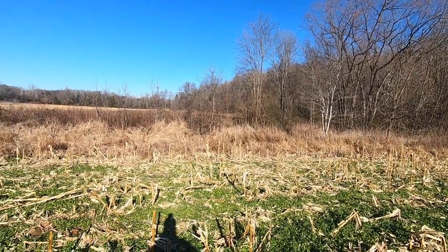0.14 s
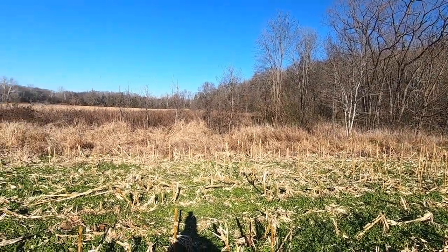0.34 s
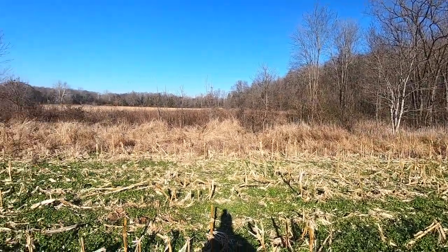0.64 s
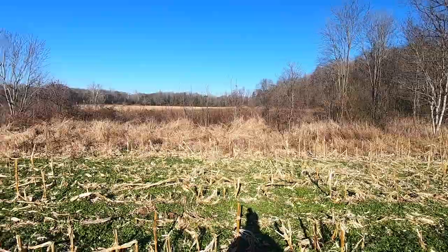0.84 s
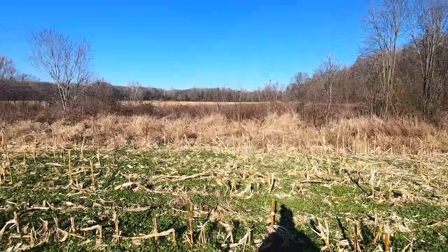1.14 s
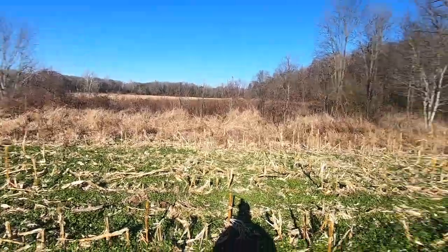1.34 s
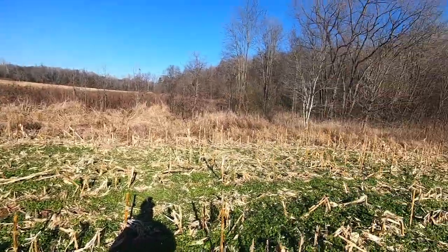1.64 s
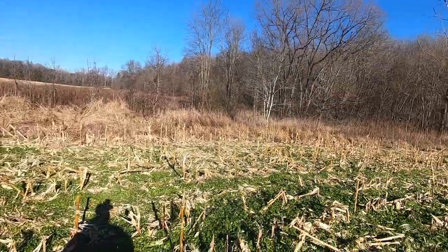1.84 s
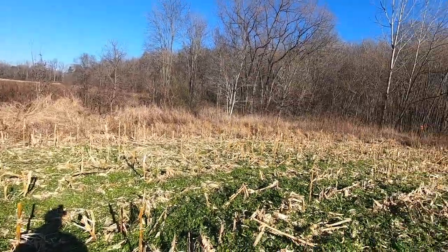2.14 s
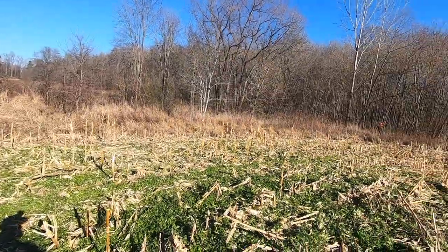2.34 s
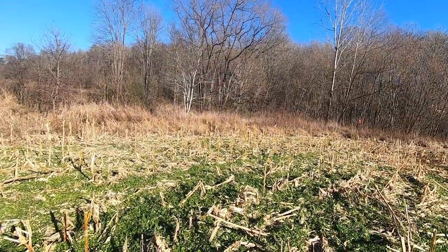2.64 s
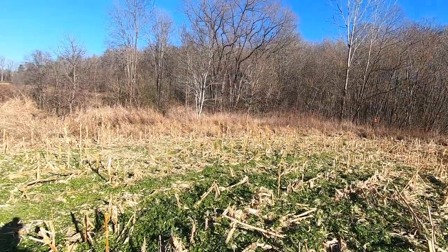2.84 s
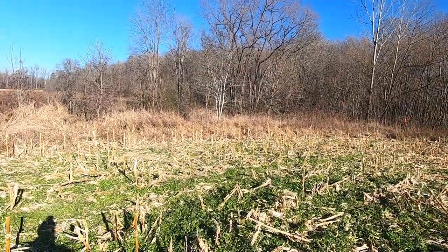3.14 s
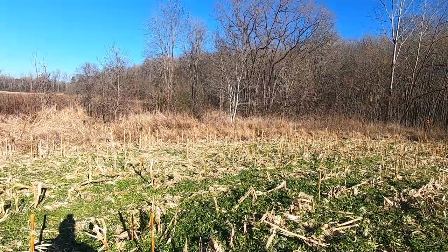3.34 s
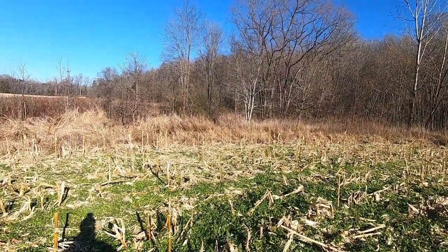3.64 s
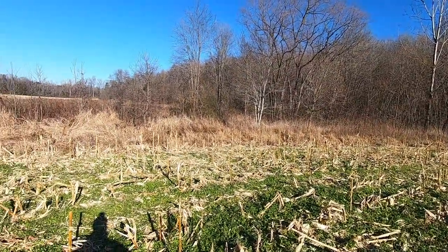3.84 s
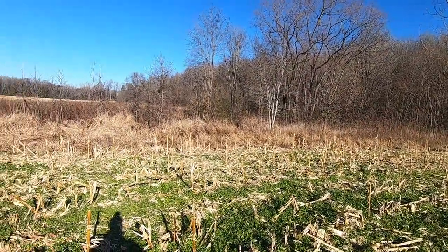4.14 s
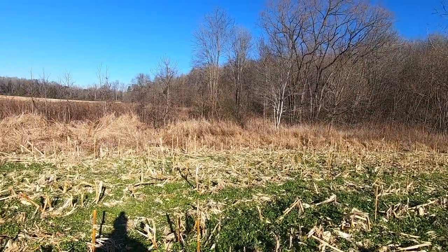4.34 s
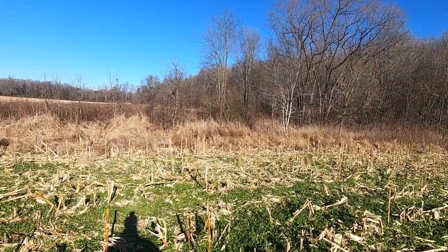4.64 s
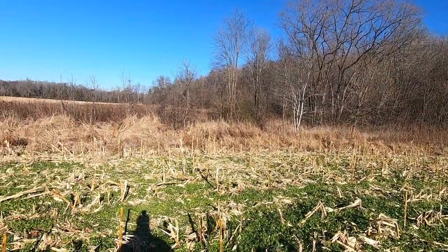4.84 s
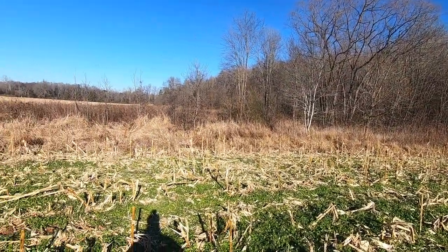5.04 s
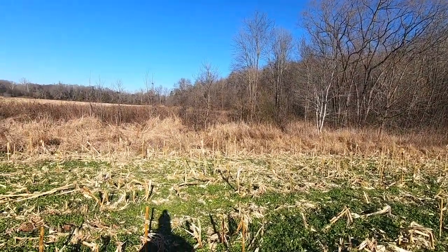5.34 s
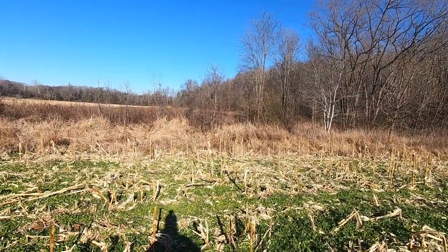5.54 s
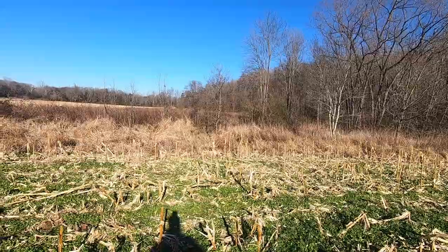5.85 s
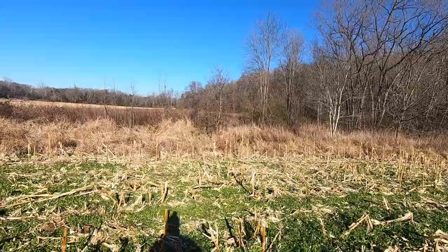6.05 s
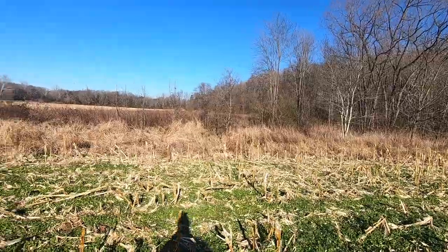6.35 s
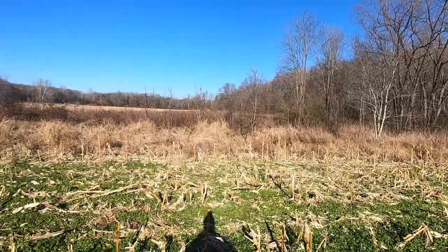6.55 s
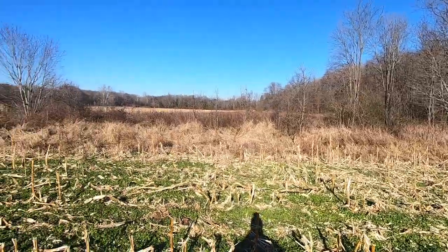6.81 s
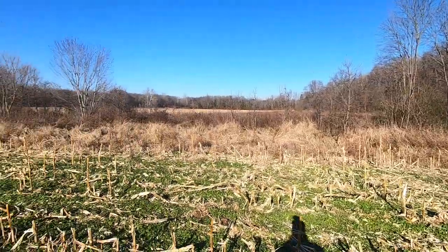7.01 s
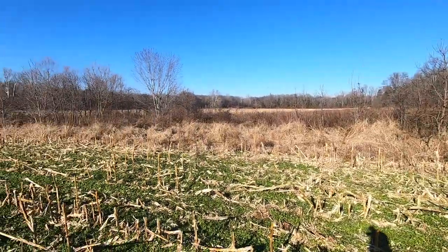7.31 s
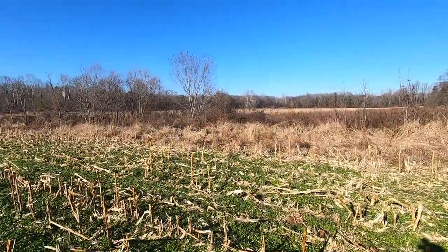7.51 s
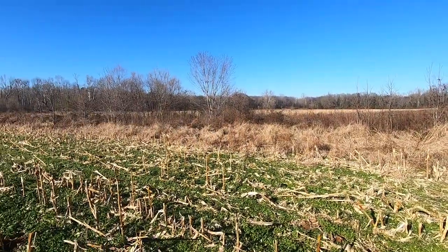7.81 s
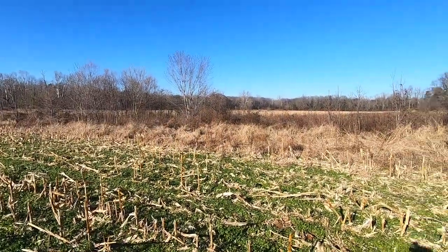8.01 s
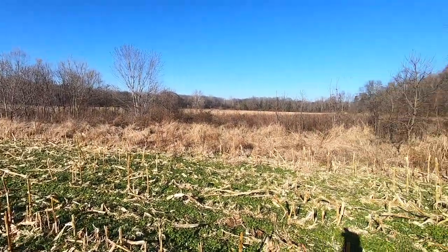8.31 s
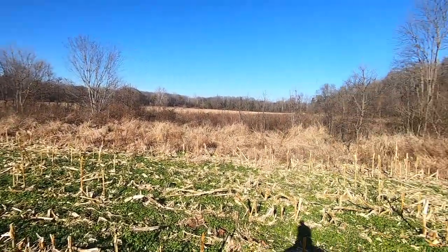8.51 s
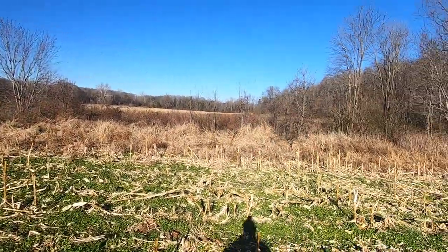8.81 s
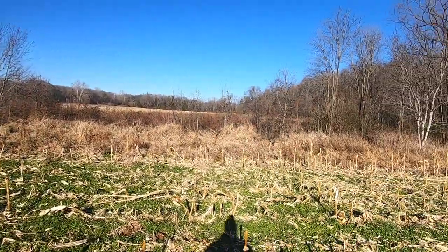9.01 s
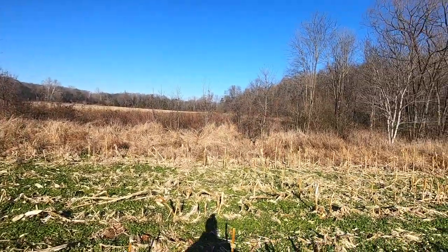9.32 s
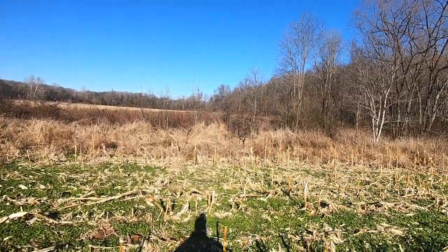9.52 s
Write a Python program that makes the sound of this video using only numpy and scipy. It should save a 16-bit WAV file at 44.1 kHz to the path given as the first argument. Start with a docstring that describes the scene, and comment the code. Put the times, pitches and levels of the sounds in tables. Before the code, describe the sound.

Hounds on a trail give clear bays, rough barks and a high squeal, echoing off woods over low wind drone and later rustling.

```python
"""A pack of beagles runs a trail in the brush beyond a stubble field, in light wind over a low drone.
From the start clean bays and hoarse barks overlap, built from harmonics that roughen with hoarseness,
and the edge of the woods returns a diffuse noise tail. One high squeal rises about 5 s in, among yelps.
Buffeting noise on the ports grows from 4 s. A dry noise rustles close by, plainest from about 7 s,
as the camera swings round and the pack shifts between the ports; two soft knocks follow near 8.7 s."""
import sys
import numpy as np
from scipy import signal
from scipy.fft import rfft, irfft, next_fast_len
from scipy.io import wavfile
from scipy.ndimage import uniform_filter1d, minimum_filter1d, map_coordinates

SR = 44100
rng = np.random.default_rng(int(sys.argv[2]) if len(sys.argv) > 2 else 0)


def pcm_store(signal):
    """Save signal as 16-bit PCM."""
    levels = np.round(np.clip(np.atleast_2d(signal), -1, 1) * 32767)
    wavfile.write(sys.argv[1], SR, levels.astype(np.int16).T)


N = 426447
TOP_HZ = 15900  # band limit of the recorder


def amp(db):
    """Turn decibels into a gain factor on the sound pressure."""
    return 10 ** (np.asarray(db) / 20)


def unit(x):
    """Scale to rms 1, so that a level in dB can be set afterwards."""
    return x / np.sqrt(np.mean(x ** 2) + 1e-20)


def along(points, hz):
    """Read (f/Hz, value) points on a log frequency axis."""
    f, values = np.transpose(points)
    return np.interp(np.log(hz + 1), np.log(f + 1), values)


def curve(rows):
    """Read (t/s, value) rows at every sample."""
    return np.interp(np.arange(N) / SR, *np.transpose(rows))


def wobble(rate, size=N):
    """A smooth random curve with rate knots a second."""
    knots = rng.standard_normal(int(max(size / SR, .5) * rate) + 4)
    return map_coordinates(knots, [np.arange(size) * rate / SR + 1])


def filtered(x, response):
    """Weight the spectrum by a response that is a function of frequency."""
    padded = next_fast_len(N + SR // 2)
    spectrum = rfft(x, padded) * response(np.fft.rfftfreq(padded, 1 / SR))
    return irfft(spectrum, padded)[..., :N]


def noise(colour, alike):
    """Coloured stereo noise of rms 1; alike is the share of its power common to both ports."""
    white = rng.standard_normal((3, N))
    mixed = np.sqrt(alike) * white[2] + np.sqrt(1 - alike) * white[:2]
    return unit(filtered(mixed, lambda hz: amp(along(colour, hz))))


def panned(x, left_db):
    """Tilt the balance between the two ports: half the difference up on one, half down on the other."""
    return x * amp(np.array([[1], [-1]]) * left_db / 2)


def span(start, length):
    """The sample times of one event."""
    return max(start, 0) + np.arange(int(length * SR)) / SR


def bursts(rows, t60):
    """An envelope that jumps at each (t/s, level/dB) row and dies by 60 dB in t60 seconds."""
    envelope, age = np.zeros(N), np.arange(SR // 8) / SR
    for s, db in rows:
        envelope[round(s * SR):][:len(age)] += amp(db - 60 * age / t60)
    return envelope


def hush(body_db=-3, swing_db=4.5, body_hz=450):
    """A steady hiss whose low body swells and ebbs at random, like soft rubbing."""
    # Colour of the hiss and its low body: f/Hz, relative density/dB
    air_colour = [(30, -3.5), (100, -14), (300, 9.5), (700, -13), (2500, -2), (4500, -7.5), (9000, -20.5),
                  (11000, -30), (13000, -25), (15500, -55.5)]
    air = noise(air_colour, alike=0.75)
    body = filtered(air, lambda hz: 1 / (1 + (hz / body_hz) ** 8))
    return air - body + body * amp(body_db + swing_db * wobble(7))


def wind(breeze_db=-37, drone_db=-32, drone_hz=45.8, hush_db=-48):
    """Lumpy buffeting on each port, a low drone with its octave, and a faint hush under both."""
    # Gusts on the ports: t/s at the peak, half width/s, level/dB before the balance
    gust_rows = [(0.7, 0.24, -34.5), (1.53, 0.058, -34), (1.86, 0.037, -33.5), (4.04, 0.031, -27.5),
                 (4.4, 0.15, -26.5), (5.799, 0.18, -25.5), (6.2, 0.13, -19.5), (6.521, 0.11, -23),
                 (6.8, 0.13, -18), (8.85, 0.037, -19), (9.2, 0.27, -24), (9.639, 0.043, -7)]
    # Colour of the buffeting: f/Hz, relative density/dB
    buffet_colour = [(12, -39.5), (20, -16), (43, -0.5), (87, -2), (128, -8.5), (259, -26), (420, -43),
                     (550, -60.5), (920, -120)]
    t = np.arange(N) / SR
    swells = sum(amp(db) * np.exp(-((t - s) / width) ** 2) for s, width, db in gust_rows)
    strength = amp(breeze_db) + swells
    # Each port has its own lumps, held within 5 dB up or down.
    lumps = amp(5 * np.tanh(np.array([wobble(24), wobble(24)])))
    buffet = strength * unit(lumps * noise(buffet_colour, alike=0.52))
    phase = 2 * np.pi * np.cumsum(drone_hz * (1 + 0.0444 * wobble(14))) / SR
    tone = unit(np.sin(phase) + 0.39 * np.sin(2 * phase))
    drone = amp(drone_db + 2.6 * wobble(9.8)) * tone
    return panned(buffet, left_db=-6.5) + drone + amp(hush_db) * hush()


def rustle(level_db=-1, grain_db=2.0, snap_db=-8, rise=0.21):
    """Dry rubbing noise, grainy in time: each rub rises quickly and ebbs, with sharper snaps and two knocks."""
    # Faint rustle under the rubs: t/s, relative level/dB
    floor_rows = [(0, -48.5), (1.5, -50), (2.1, -55), (2.8, -55.5), (3.8, -49.5), (6.5, -44.5), (9.67, -44)]
    # Dry rubs close by: t/s, length/s, relative level/dB
    rub_rows = [(1.3, .45, -43), (6.683, 0.28, -40.5), (7.167, 0.27, -30.5), (7.31, 0.61, -39.5),
                (7.722, 0.05, -37), (8.017, 0.47, -39), (8.374, .3, -40.5), (8.617, 0.12, -32.5)]
    # Dry snaps within the rustle: t/s, relative peak level/dB
    snap_rows = [(7.0435, -35), (7.0685, -21), (7.195, -26), (7.308, -26), (7.5063, -25.5), (7.5523, -28.5),
                 (7.937, -42), (8.0267, -22)]
    # Soft handling knocks on the camera: t/s, level/dB
    knock_rows = [(8.72, -27), (8.735, -26)]
    # Colours of the dry stuff and of the camera case: f/Hz, relative density/dB
    dry_colour = [(300, 6.5), (1500, 3), (5000, -8), (7000, -8.5), (8700, -5.5), (11000, -16), (14000, -27),
                  (16000, -28.5)]
    case_colour = [(80, -6), (300, -2), (700, -7.5), (1700, -17), (2600, -22), (6000, -45.5)]
    t = np.arange(N) / SR

    def stroke(age):
        """The force of one rub, which peaks at age 1."""
        return age * np.exp(1 - age)

    rubs = sum(amp(db) * stroke(np.maximum(t - s, 0) / (rise * length)) for s, length, db in rub_rows)
    force = amp(curve(floor_rows)) + rubs
    grain = unit(amp(grain_db * wobble(260) + 2.8 * wobble(30)))
    strength = amp(level_db) * force * grain + amp(snap_db) * bursts(snap_rows, t60=0.091)
    rubbing = strength * noise(dry_colour, alike=0.24)
    knocks = bursts(knock_rows, t60=0.11) * noise(case_colour, alike=0.93)
    return panned(rubbing, left_db=-6) + knocks


def woods(x, build=0.012, apart=0.74):
    """Trunks scatter the calls back in a diffuse tail that builds up and decays at a rate set by frequency."""
    # Echo of the woods: f/Hz, t60/s
    decay_times = [(600, .75), (1400, .8), (2800, .6), (8000, .3)]
    hz, t, z = signal.stft(rng.standard_normal((2, SR)), SR, nperseg=256)
    z = z * amp(-60 * t / along(decay_times, hz)[:, None]) * (1 - np.exp(-t / build))
    common, own = signal.istft(z, SR, nperseg=256)[1]
    tail = np.array([common + apart * own, common - apart * own])
    return signal.fftconvolve(x[None], tail / np.linalg.norm(tail[0]), axes=1)[:, :N]


def whistles(waver=0.018):
    """A second, much higher oscillator in the throat glides for a moment."""
    # Thin whistles amid the fiercest barking: t/s, length/s, start f/Hz, end f/Hz, peak level/dB
    whistle_rows = [(5.797, 0.065, 7170, 7730, -40), (6.15, .09, 7200, 6600, -43),
                    (6.317, 0.029, 7770, 7900, -32.5)]
    sound = np.zeros(N)
    for start, length, from_hz, to_hz, db in whistle_rows:
        t = span(start, length)
        hz = np.linspace(from_hz, to_hz, len(t)) * (1 + waver * wobble(90, len(t)))
        tone = np.sin(2 * np.pi * np.cumsum(hz) / SR)
        sound[round(start * SR):][:len(t)] += amp(db) * np.hanning(len(t)) ** .5 * tone
    return sound


def bay(t, pitch, hoarse, first_db, second_db, mouth_db, mouth_hz,
        low_doubling=0.53, doubling=0.76,  # beat depth of the fundamental against the rest; of a hoarse voice
        jitter=0.98, rasp=0.98, rasp_hz=330,  # phase and share of the chaos, and its knots a second
        waver=0.0058, lurch=.02,  # pitch unsteadiness, clean and added by hoarseness
        mouth_width_hz=480, flutter_db=3.0, blur=0.31,
        attack=0.0019, release=0.023):  # s
    """One call: harmonics of the vocal folds, whose cycles turn irregular as the hound goes hoarse."""
    # Higher resonances of the muzzle: f/Hz, level/dB relative to the mouth resonance
    muzzle = [(2500, -49), (3300, -21.5), (4000, -37.5), (5400, -31), (7500, -39.5), (10500, -47.5),
              (14000, -87)]
    # A bay near 6 s cracks into period doubling: t/s, added depth of the every-other-cycle beat
    crack_rows = [(6.04, 0), (6.06, 0.3), (6.105, 1.5), (6.12, 0.0015)]
    # Brush between the hounds and the field: t/s, cover 0-1
    cover_rows = [(0, 0.92), (2.8, 0.8), (4.7, 0.48), (7, 0.81), (9.6, 0.59)]
    hoarse, size = np.clip(hoarse, 0, 1), len(t)
    k = np.arange(1, 14)[:, None]  # harmonic numbers

    def each(rate):
        """An independent wobble for every harmonic."""
        return np.array([wobble(rate, size) for _ in k])

    # The open mouth lifts whichever overtones lie near its resonance.
    mouth = 1 / (1 + ((k * pitch - mouth_hz) / mouth_width_hz) ** 4)
    upper = (k > 2) * (mouth + amp(along(muzzle, k * pitch)))
    upper = upper / np.linalg.norm(upper, axis=0)
    gains = amp(mouth_db) * upper + (k == 1) * amp(first_db) + (k == 2) * amp(second_db)

    # A strained voice lurches in pitch.
    phase = 2 * np.pi * np.cumsum(pitch * (1 + (waver + lurch * hoarse) * wobble(83.8, size))) / SR

    # Chaotic vibration takes a share of every harmonic and spreads it into a band, widest for the overtones.
    share = np.clip(rasp * hoarse, 0, 1) ** 2
    chaos = each(rasp_hz) + 1j * each(rasp_hz)
    chaos = chaos / np.sqrt(np.abs(chaos) + 1e-9)  # even out its swings in level
    chaos = chaos * np.exp(1j * jitter * np.minimum(k, 3) * wobble(330, size))
    voice = np.sqrt(1 - share) + np.sqrt(share) * chaos

    # When strong and weak cycles alternate, lines appear halfway between the overtones.
    depth = doubling * hoarse + np.interp(t, *np.transpose(crack_rows))
    voice = voice * (1 + np.where(k > 1, 1, low_doubling) * depth * np.cos(phase / 2))

    # As the hound runs, shifting paths through the brush make each harmonic flutter and blur the higher ones.
    cover = np.interp(t[0], *np.transpose(cover_rows))
    flutter = unit(amp(flutter_db * cover * each(54.6)))
    paths = flutter * np.exp(1j * blur * cover * np.minimum(k, 4) * each(110.8))

    harmonics = np.imag(voice * paths * np.exp(1j * k * phase))
    sound = np.sum(gains * (k * pitch < TOP_HZ) * harmonics, axis=0)
    gate = np.clip((t - t[0]) / attack, 0, 1) * np.clip((t[-1] - t) / release, 0, 1)
    # The root of 2 makes the harmonic levels rms levels.
    return np.pad(np.sqrt(2) * sound * gate, (round(t[0] * SR), N))[:N]


def squeal(hoarse=0.013, third_db=-43, mouth_hz=4300):
    """One hound holds a thin, clean note an octave above the rest."""
    # The long squeal: t/s, pitch f/Hz, fundamental level/dB, second harmonic level/dB
    squeal_rows = [(5.045, 1463, -17, -23), (5.065, 1486, -11.5, -14), (5.145, 1375, -13.5, -15.5),
                   (5.235, 1434, -19, -19.5), (5.261, 1420, -42, -21), (5.293, 1433, -15, -23),
                   (5.31, 1460, -17, -26)]
    s, *columns = np.transpose(squeal_rows)
    t = span(s[0], s[-1] - s[0])
    pitch, first_db, second_db = [np.interp(t, s, column) for column in columns]
    return bay(t, pitch, hoarse, first_db, second_db, third_db, mouth_hz)


def call(row, swell_db, second_swell_db, bright_db, fade_db, roundness, edge_rasp, catch, catch_s, closing,
         shut_db=4, open_s=0.0073, soft_db=7, ease=0.04, bend=0.04, tail_s=0.013):
    """One push of breath swells to a crest and ebbs, shaping level, pitch and hoarseness as the jaw moves."""
    start, length, pitch, glide, arch, crest, hoarse, first_db, second_db, mouth_db, mouth_hz = row
    t = span(start, length + tail_s)
    u = np.clip((t - start) / length, 0, 1)  # share of the call gone by
    # Slack is 0 at the crest of effort and 1 at both ends.
    slack = np.interp(u, [0, np.clip(crest, .05, .95), 1], [1, 0, 1]) ** roundness

    # The voice catches high before it settles.
    semitones = glide * (u - .5) - arch * slack + catch * np.exp(-(t - start) / catch_s)
    hz = pitch * 2 ** ((semitones + bend * wobble(28, len(t))) / 12)

    # The longer the call, the more gently it starts; the overtones come in as the jaw opens.
    onset_db = soft_db * np.exp(-u / ease)
    muffle_db = shut_db * np.exp(-(t - start) / open_s)
    first_db = first_db - onset_db - swell_db * slack
    second_db = second_db - onset_db - muffle_db - second_swell_db * slack
    # As the jaw closes, the mouth resonance sinks and fades.
    mouth_db = mouth_db - muffle_db - bright_db * slack - fade_db * (u - .5)
    mouth_hz = mouth_hz * (1 - closing * (u - .5))
    return bay(t, hz, hoarse * (1 + edge_rasp * slack), first_db, second_db, mouth_db, mouth_hz)


def pack(low_hz=520):
    """All the hounds together; their small throats pass nothing far below the pitch."""
    # Tuneful bays, with hoarseness and nominal levels for the crest: t/s, length/s, pitch f/Hz,
    # glide from start to end/semitones, arch of the crest above the ends/semitones,
    # crest as a share of the call 0-1, hoarseness 0-1, fundamental level/dB,
    # second harmonic level/dB, mouth resonance level/dB, mouth resonance f/Hz
    bay_rows = [ (0.01, .25, 690, 1.26, 2.1, 0.26, 0.23, -27.5, -21.5, -34.5, 2170),
                (0.083, 0.15, 797, -0.4, 0.5, 0.4, 0.04, -23.5, -39, -65, 2800),
                (0.162, 0.18, 640, 0.04, 0.94, 0.57, 0.17, -27, -24.5, -31, 2220),
                (0.542, 0.16, 649, 0.5, 2.1, 0.43, 0.17, -25.5, -21, -31.5, 2120),
                (0.868, 0.096, 719.5, 0, 0.4, 0.1, 0.31, -21.5, -40, -51, 2200),
                (0.948, .15, 665.4, 4.5, 0.2, 0.55, 0.31, -24, -22.5, -31.5, 1900),
                (1.068, 0.059, 732, 1, 0.9, 0.32, 0.2, -19.5, -38, -53, 2200),
                (1.15, 0.083, 625, -0.6, -.5, .4, 0.05, -19, -31.5, -47, 1960),
                (1.211, 0.237, 650, 0.3, 0.2, 0.34, 0.03, -18.5, -42, -36.5, 1900),
                (1.434, 0.13, 716, 0, 1.8, 0.26, 0.2, -21, -29.5, -38, 2540),
                (1.553, 0.064, 739, 0.3, 0, 0.15, 0.02, -13, -48, -37.5, 2300),
                (1.562, 0.22, 683.6, 0.2, 1.9, 0.15, 0.09, -27, -27, -34.5, 2130),
                (1.801, 0.26, 641.3, 1.23, -0.06, 0.88, .27, -15, -29, -35.5, 2190),
                (2.179, 0.16, 716, 0.8, 0.85, 0.32, .45, -17, -32, -35.5, 2200),
                (2.526, .28, 677.7, 0.2, 2.16, 0.45, 0.23, -17, -24.5, -36, 2270),
                (2.963, 0.15, 738.3, 1.5, 2.6, 0.4, .08, -14.5, -34.5, -38.5, 2280),
                (3.212, .155, 646.6, -0.3, -0.4, 0.42, 0.05, -9, -38, -34, 1920),
                (4.26, .15, 641, 0.4, -0.6, 0.52, 0.02, -9.5, -34, -40, 1970),
                (4.428, 0.083, 655, 0.94, -0.44, 0.4, 0.01, -11.5, -42, -43.5, 2060),
                (4.761, 0.26, 611, -0.17, -.1, 0.95, 0.03, -15.5, -38.5, -29, 2320),
                (4.848, .08, 698, 1, 1.1, 0.05, 0.25, -24, -28.5, -23.5, 2400),
                (5.018, 0.03, 697, -0.7, -.5, 0.7, .1, -21, -32, -22.5, 2230),
                (5.07, .2, 735.5, -0.3, 3, 0.5, 0.52, -22, -29.5, -33.5, 2110),
                (5.349, 0.11, 622, 2, 1.4, 0.5, 0.1, -24.5, -34, -31.5, 1880),
                (5.424, .125, 622, 0.36, .7, 0.9, 0.11, -16.5, -19, -23, 2070),
                (5.512, 0.077, 645, 0.7, 1.5, 0.3, 0.25, -28.5, -25, -31.5, 1940),
                (5.626, 0.12, 707, 1.8, -3, 0.28, 0.21, -15.5, -29.5, -31.5, 2650),
                (5.959, 0.21, 640, 1.3, 1.14, 0.41, 0.04, -15, -27.5, -27, 1900),
                (6.235, 0.086, 750, 0.1, 1.6, .55, 0.18, -21.5, -21, -19, 2840),
                (6.274, 0.4, 758.4, 0.5, -0.4, 0.53, 0.08, -23.5, -32, -56, 2300),
                (6.447, 0.25, 651, 2.1, .9, 0.27, 0.05, -12, -34, -29.5, 1860),
                (6.645, 0.087, 628, 2.5, 0.3, 0.36, .08, -26, -19.5, -17.5, 2190),
                (6.924, 0.093, 665, 1.7, 0.7, 0.61, 0.3, -22.5, -25, -25, 2430),
                (6.988, 0.22, 636, 0, 0.3, 0.48, 0.07, -9.5, -33, -51, 2320),
                (7.095, 0.068, 680, -0.3, 1.4, 0.37, 0.25, -16, -36.5, -25.5, 2130),
                (7.015, 0.12, 636, 2, 0.3, 0.38, 0.17, -25.5, -16, -16, 2224),
                (7.178, 0.085, 611, -0.4, -0.5, 0.46, 0.1, -22, -34, -52, 2300),
                (7.383, 0.068, 632, 0.7, 0, 0.44, 0.17, -16.5, -26, -18.5, 2230),
                (7.432, 0.2, 651.4, -0.5, 1.4, 0.22, 0.05, -9.5, -23.5, -32.5, 1950),
                (7.433, 0.08, 703.5, 2.5, -0.6, 0.52, 0, -10.5, -25, -26.5, 2250),
                (8.353, 0.13, 629, -2, 1.2, 0.42, 0.18, -21, -32, -23, 2080),
                (8.443, 0.086, 625, -0.3, 0.9, .3, 0.1, -38, -24.5, -51, 1900),
                (8.77, 0.12, 728, 1, 2.26, 0.52, 0.07, -8.5, -34, -25.5, 2150),
                (9.121, .16, 717.3, 1, 3, .48, 0.11, -16, -25, -29, 2450),
                (9.454, 0.071, 922, -3, 3.3, 0.3, .15, -26.5, -38, -43, 2700),
                (9.46, 0.24, 687.5, -0.8, 1.05, 0.29, 0.23, -25.5, -26.5, -37, 2340),
                (9.502, 0.11, 645, 2.5, 0.8, 0.68, 0.04, -21, -27.5, -25, 2350), ]
    # Hoarse barks: same columns
    bark_rows = [ (0.5, 0.21, 689.6, -2, 0.14, 0.53, 0.77, -24.5, -31.5, -32.5, 2080),
                 (0.88, 0.23, 698, -1, .1, 0.66, 0.99, -26, -33.5, -39, 2100),
                 (2.04, .17, 656, -0.4, -.4, 0.43, 0.79, -21.5, -30, -37.5, 2200),
                 (2.505, 0.22, 684, -0.5, 0.015, 1, 0.93, -23.5, -35, -36.5, 2190),
                 (3.06, 0.17, 709, -3.5, .3, 0.67, 0.79, -21, -23, -22.5, 2170),
                 (3.38, .17, 715, -1.4, -0.69, 0.84, 0.52, -22, -33, -31, 2160),
                 (3.54, .14, 780, .4, .4, 0.43, 0.87, -18, -20.5, -26, 2200),
                 (3.62, .125, 830, -1, .6, 0.49, 0.94, -16.5, -30.5, -29.5, 2240),
                 (3.98, .22, 678.6, -4, -0.9, 0.64, 0.77, -22.5, -32.5, -30.5, 2080),
                 (4.598, .09, 714, -2.5, 1, .35, .72, -22.5, -27.5, -26, 2100),
                 (4.69, 0.08, 693.5, 0.5, .1, 0.93, 1, -26, -25.5, -28, 2030),
                 (5.71, 0.17, 735, 0, .6, 0.51, .88, -13.5, -22, -14.5, 2266),
                 (5.89, .1, 626.5, -1, -0.36, 0.37, 0.63, -30.5, -22, -32.5, 2040),
                 (6.168, .1, 678, 0, -.5, 0.54, 0.55, -12, -18, -15, 2890),
                 (6.2, 0.162, 750, -0.2, .5, .52, 0.87, -13.5, -17.5, -15.5, 2230),
                 (6.7, 0.105, 714, -2.5, 0.39, 0.24, 0.44, -20, -25.5, -23, 2280),
                 (6.77, .13, 642.4, 1.8, -0.083, 0.34, 1, -17, -31.5, -35, 1930),
                 (7.945, .11, 790, -3.5, 0.22, 0.81, 0.65, -23, -27.5, -27, 2230),
                 (8.01, .125, 635, -4, -0.41, 0.42, 0.77, -19.5, -30.5, -27.5, 1930),
                 (8.81, 0.12, 687, -1, 0.26, 0.6, 0.57, -27, -41.5, -33.5, 2170),
                 (9.2, 0.081, 676.4, -4, 0.13, 0.54, 0.46, -26.5, -31.5, -37, 2350),
                 (9.58, .09, 660, -2.5, 0.38, .3, 0.42, -18.5, -34, -24.5, 1990), ]
    # Bright yelps and squeaks: same columns
    yelp_rows = [ (3.205, 0.035, 1214, 0.057, 0.31, .45, 0.18, -18, -17, -42, 3780),
                 (4.75, .106, 737.4, 1.5, -.8, 0.15, 0.07, -22.5, -9, -18.5, 2580),
                 (4.929, .088, 783, 0.22, -0.97, 0.37, 0.066, -21.5, -13.5, -16, 2340),
                 (5.715, .03, 1302, 2.3, 0.25, 0.6, 0.12, -26, -7.5, -44.5, 4000),
                 (5.85, 0.042, 1233, -0.46, 0.45, 0.6, 0.16, -15, -9, -32, 3780), ]
    bays = sum(call(row, swell_db=10.5, second_swell_db=8, bright_db=7.5, fade_db=7.5, roundness=1.629,
                    edge_rasp=0.033, catch=1.147, catch_s=0.0089, closing=0.07) for row in bay_rows)
    barks = sum(call(row, swell_db=7.5, second_swell_db=5, bright_db=8.5, fade_db=3.5, roundness=1.75,
                     edge_rasp=-0.44, catch=1, catch_s=0.01535, closing=0.047) for row in bark_rows)
    yelps = sum(call(row, swell_db=1, second_swell_db=19, bright_db=8, fade_db=1.5, roundness=2.2,
                     edge_rasp=5.7, catch=2, catch_s=.005, closing=0.066) for row in yelp_rows)
    voices = bays + barks + yelps + squeal() + whistles()
    return filtered(voices, lambda hz: 1 - 1 / (1 + (hz / low_hz) ** 16))


def ports(x):
    """Sound from one side reaches one port a little before the other."""
    # How much sooner the calls reach the left port as the camera turns: t/s, lead/ms
    lead_rows = [(0, -.01), (1.1, -.04), (2.2, .02), (3, 0), (6.8, 0), (7.2, .09), (8.2, .11), (8.7, 0)]
    lead = curve(lead_rows) * SR / 1000  # samples
    return np.array([map_coordinates(x, [np.arange(N) + side * lead / 2]) for side in (1, -1)])


def scene():
    """Wind and rustle at the camera, with the distant hounds and their echo from the same side."""
    # Where the pack lies as the camera turns: t/s, left over right level/dB
    bearing_rows = [(0, -2.5), (.9, -6), (1.3, -6), (2.1, .7), (2.7, 2.2), (3.3, -1.3), (5.7, -1.8),
                    (6.7, -4), (7.4, -8), (8.4, -7.5), (8.9, -3), (9.6, -3)]
    hounds = pack()
    echo = amp(-13) * woods(hounds)
    return wind() + rustle() + panned(ports(hounds) + echo, curve(bearing_rows))


def record(dry, ceiling=1.0, hold_s=0.0013):
    """A quick limiter holds back the peaks, the last 4 ms fade out, and a filter cuts all above the band limit."""
    needed = np.minimum(1, ceiling / (np.abs(dry).max(axis=0) + 1e-9))
    hold = 2 * int(hold_s * SR) + 1  # samples
    gain = uniform_filter1d(minimum_filter1d(needed, hold), hold)
    fade = np.minimum(1, np.arange(N)[::-1] / (.004 * SR))
    return filtered(dry * gain * fade, lambda hz: hz < TOP_HZ)


dry = scene()
out = record(dry)
pcm_store(out)
```